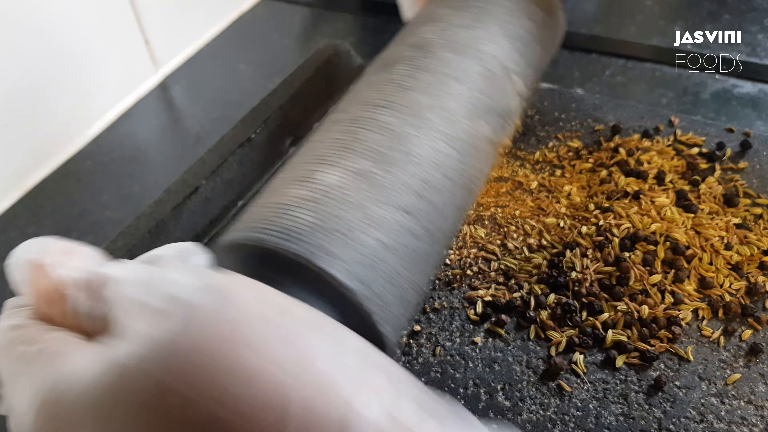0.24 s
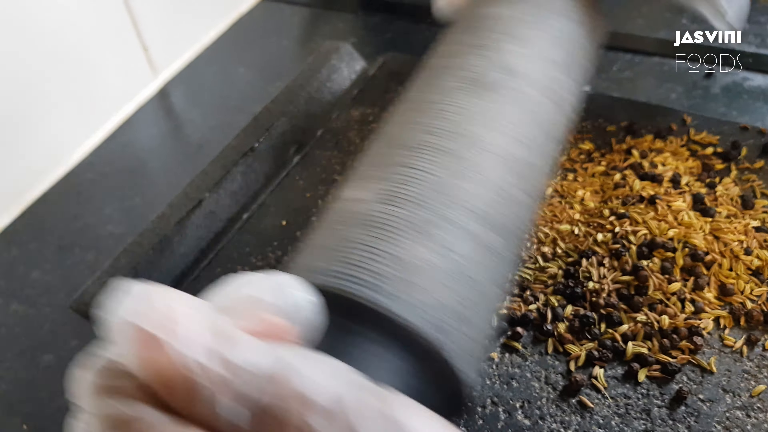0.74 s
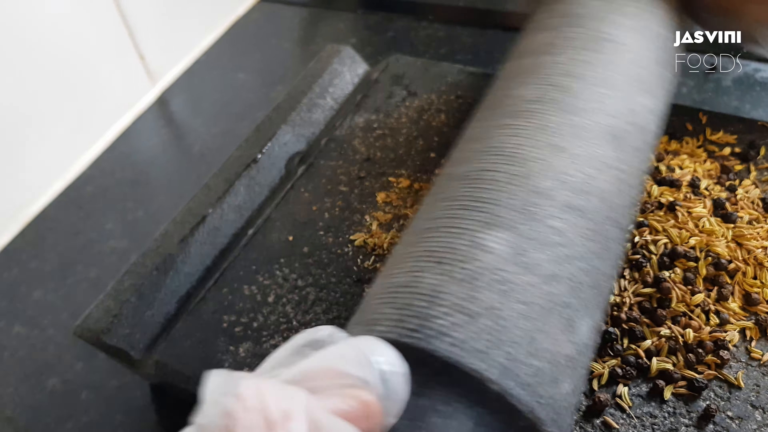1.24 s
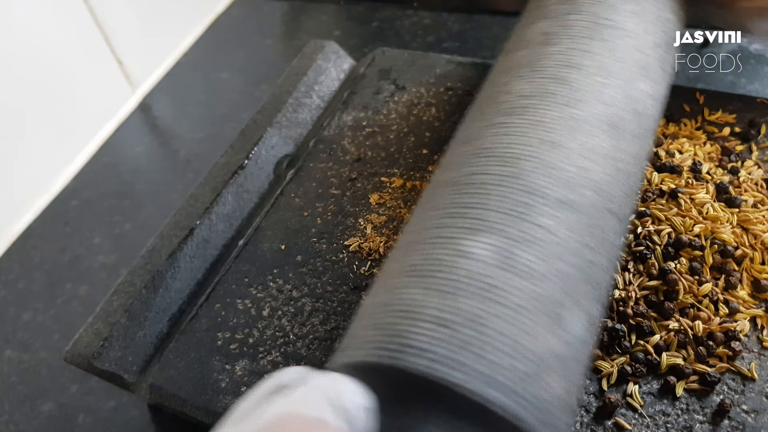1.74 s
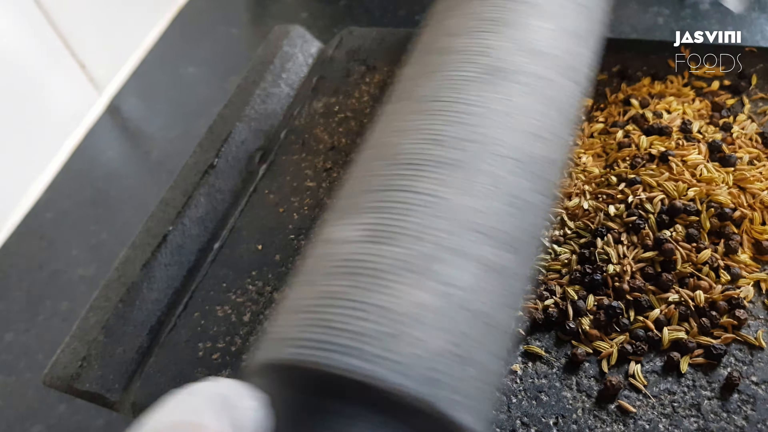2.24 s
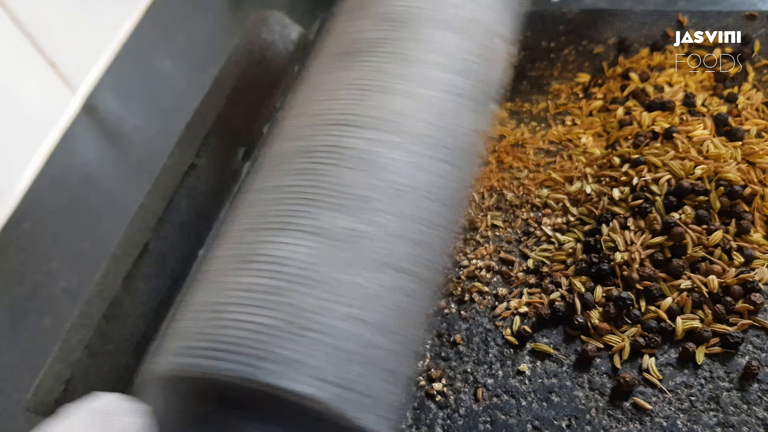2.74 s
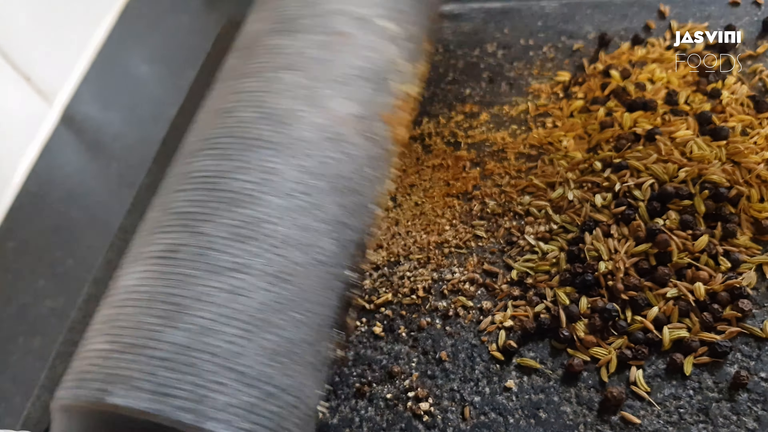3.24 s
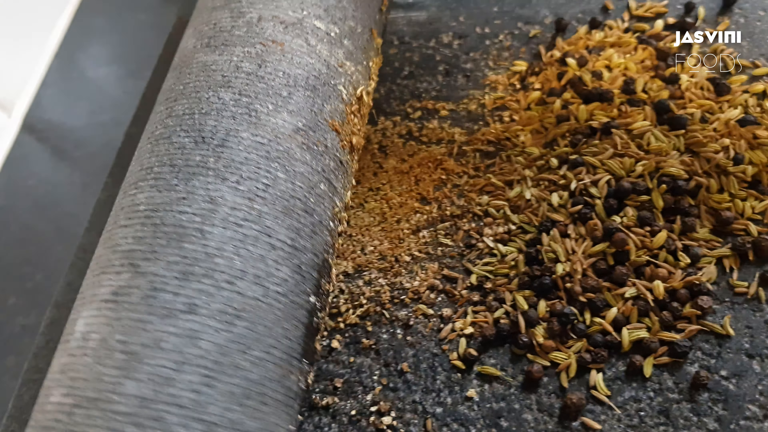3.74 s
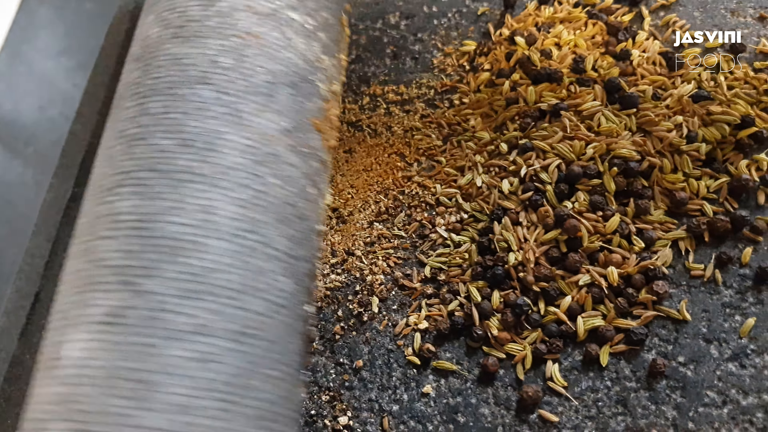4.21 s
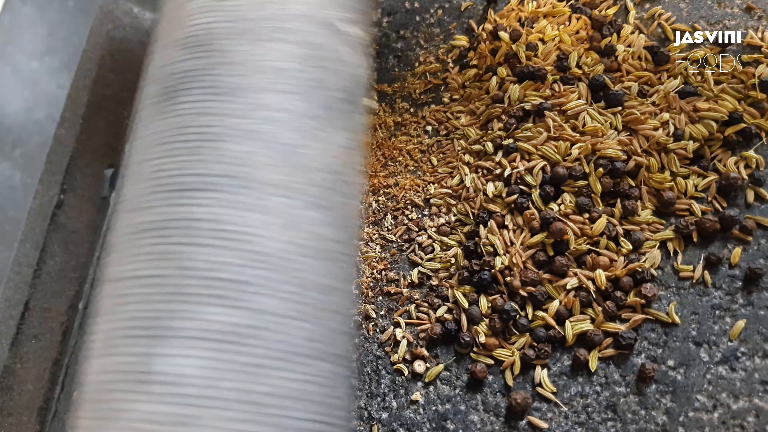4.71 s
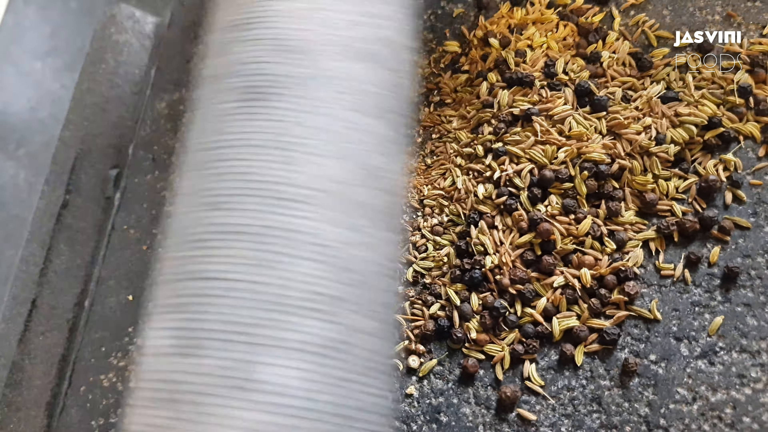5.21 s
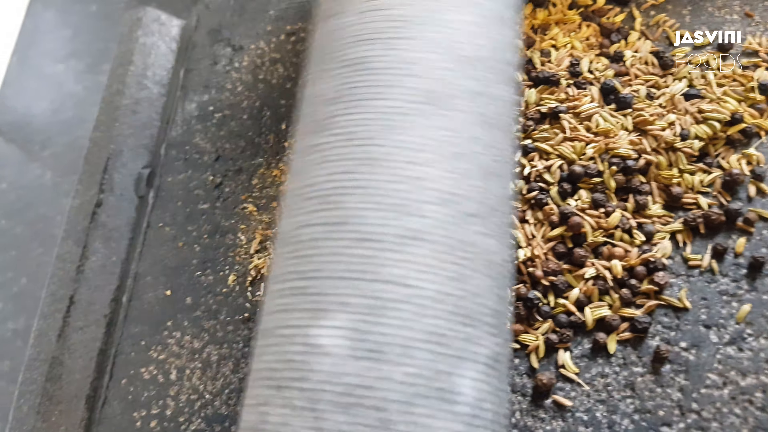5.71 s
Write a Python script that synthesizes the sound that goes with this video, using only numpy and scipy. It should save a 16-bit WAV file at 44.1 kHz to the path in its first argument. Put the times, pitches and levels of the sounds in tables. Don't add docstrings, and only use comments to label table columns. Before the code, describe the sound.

A ribbed stone roller scrapes rapidly back and forth over dry spices on a stone slab, with gritty crunching, thuds and thin ringing squeaks.

```python
import sys
import numpy as np
from scipy import signal
from scipy.fft import rfft, irfft
from scipy.io import wavfile
from scipy.ndimage import uniform_filter1d

SR = 44100
rng = np.random.default_rng(int(sys.argv[2]) if len(sys.argv) > 2 else 0)


def master_out(mix):
    frames = np.transpose(np.atleast_2d(mix))
    ceiling = np.clip(frames, -1, 1)
    pcm = np.round(ceiling * 32767).astype(np.int16)
    wavfile.write(sys.argv[1], SR, pcm)


def boost(x):
    u = np.asarray(x, float) / 20
    return 10 ** u


N = 262836
LEFT_RIGHT = np.array([[0.5], [-0.5]])


def evened(x):
    return x / np.sqrt(np.mean(x ** 2) + 1e-20)


def read(points, hz):
    f, value = np.transpose(points)
    return np.interp(np.log(hz + 1), np.log(f + 1), value)


def grit(per_s, spread_db):
    size = boost(spread_db * np.minimum(rng.exponential(1, N), 3.5))
    sign = rng.choice([-1., 1.], N)
    return evened(size * sign * (rng.random(N) < per_s / SR))


def blows(rows, db):
    force = np.zeros(N)
    force[np.round(np.array(rows)[:, 0] * SR).astype(int)] = boost(db)
    return force


def clumps(db, size):
    return boost(db * evened(uniform_filter1d(rng.standard_normal(N), size)))


def wear(db_per_s):
    return boost(db_per_s * (np.arange(N) - N / 2) / SR)


def mode(force, hz, width):
    pole = np.exp((2j * np.pi * hz - np.pi * width) / SR)
    return signal.lfilter([1], [1, -pole], force)


def struck(force, hz, width, skirt):
    return mode(mode(force, hz, skirt), hz, width) * np.pi * skirt / SR


def rubbed(hz, width):
    tone = struck(grit(2500, 2.1), hz, width, 50)
    height = uniform_filter1d(abs(tone), size=441)
    tone = tone / (height + 0.1 * height.mean()) ** 0.8
    return tone / np.sqrt(np.mean(tone.imag ** 2))


def heard(tone, db, pan_db, lead):
    return (boost(db + pan_db * LEFT_RIGHT) * np.exp(1j * lead * LEFT_RIGHT) * tone).imag


# (frequency [Hz], correlation [-1 to 1])
LIKENESS = [(60, 1), (170, 0.995), (290, 0.86), (640, 0.2), (1410, -0.3), (3100, 0.1), (6820, 0),
            (15000, 0.1)]
# (frequency [Hz], level [dB])
LEAN = [(60, .5), (130, 1), (250, -1), (450, 1), (800, 5.5), (1290, 3.5), (2380, -1), (4400, -1), (8120, 7),
        (15000, 2)]


def paths(spectrum, t60, early_t60, late_db):
    t, hz = np.arange(16384) / SR, np.fft.rfftfreq(16384, 1 / SR)
    shape = boost(-60 * t / early_t60) + boost(late_db - 60 * t / t60)
    a, b = rfft(rng.standard_normal((2, len(t))) * shape)
    same = np.clip(read(LIKENESS, hz), -1, 1)
    pair = np.array([a, same * a + np.sqrt(1 - same ** 2) * b])
    own = np.log(uniform_filter1d(abs(pair) ** 2, size=37, axis=1)) / 2
    wanted_db = np.maximum(read(spectrum, hz), -100) + read(LEAN, hz) * LEFT_RIGHT
    gain = wanted_db * np.log(10) / 20 - own
    mirrored = np.c_[gain, gain[:, -2:0:-1]]
    phase = -signal.hilbert(mirrored).imag[:, :len(hz)]
    fade = np.clip(4 - 5 * t / t[-1], 0, 1)
    response = irfft(pair * np.exp(gain + 1j * phase)) * fade
    return response / np.sqrt((response ** 2).sum() / 2)


def spread(force, turns, *response):
    angle = 2 * np.pi * turns * np.arange(N) / SR
    out = np.zeros((2, N))
    for k in range(3):
        share = force * np.cos(angle + 2 * np.pi * k / 3)
        out += signal.oaconvolve(share[None], paths(*response), axes=1)[:, :N]
    return out / np.sqrt(1.5)


# (frequency [Hz], spectral level [dB per Hz])
ROOM_TONE = [(25, 7), (104, -18), (555, -22), (1200, -15), (2020, -28), (5000, -20), (12300, -15),
             (14200, -44), (15700, -36)]


def kitchen():
    hum = evened(heard(struck(rng.standard_normal(N), 41.5, 22, 25), 0, 0, 0))
    room = spread(rng.standard_normal(N), 22.0, ROOM_TONE, 0.067, 0.011, -49)
    return boost(-61) * room + boost(-56) * hum


# (time of turn [s], speed left at the turn [dB], top speed [dB],
# weight on the counter [dB])
STROKES = [(0.0, -50.5, -52.5, -29.5), (0.251, -68.5, -57, -29), (0.46, -59, -52.5, -30.5),
           (0.726, -65.5, -51, -24), (0.908, -61, -52, -31.5), (1.156, -66, -51, -19),
           (1.357, -55, -52, -30.5), (1.59, -70.5, -49.5, -17), (1.789, -55, -50.5, -26),
           (2.056, -70.5, -51, -26.5), (2.256, -62.5, -50.5, -27.5), (2.49, -66.5, -50, -28),
           (2.71, -61.5, -51, -28), (2.94, -67, -49, -27), (3.151, -63.5, -49, -30),
           (3.37, -70.5, -48.5, -18), (3.594, -62, -49.5, -40), (3.813, -71.5, -49.5, -26),
           (4.024, -59, -50, -29), (4.254, -65.5, -51.5, -30), (4.453, -54, -51.5, -37),
           (4.704, -69, -50.5, -18.5), (4.933, -60.5, -50, -26.5), (5.143, -68.5, -49, -31),
           (5.377, -61.5, -49.5, -27.5), (5.587, -67.5, -49, -21.5), (5.826, -58.5, -50, -13),
           (5.96, -51.5, -60, -40)]
# (top at this share of a push [0-1], of a pull [0-1], roundness [exponent],
# follow [dB per dB of speed], level [dB])
FOLLOWS = [
    (0.5, 0.53, 1.2, 1.3, -33),
    (0.39, 0.34, 1.9, 0.71, -33.5),
    (0.51, 0.37, 1.13, 1.4, -44.5),
    (0.55, 0.35, 0.93, 1.15, -51),
    (0.55, 0.38, 0.85, 2.8, -0.5),
]
PULL_DB = [-0.5, 2.6, -2, 0.2, 10]


def stroke(layer):
    usual_speed_db, usual_weight_db = -51, -32
    turns, rest_db, top_db, weight_db = np.transpose(STROKES)
    push_at, pull_at, roundness, follow, db = FOLLOWS[layer - 1]
    t = np.arange(0, N, 32) / SR
    k = np.clip(np.searchsorted(turns, t, "right") - 1, 0, len(turns) - 2)
    u = np.clip((t - turns[k]) / np.diff(turns)[k], 0, 1)
    at = np.clip(np.where(k % 2, push_at, pull_at), 0.1, 0.9)
    arch = np.sin(np.pi / 2 * np.minimum(u / at, (1 - u) / (1 - at))) ** roundness
    if layer == 2:
        top_db = weight_db - usual_weight_db + usual_speed_db
    rest = rest_db[k + (u > at)]
    speed_db = rest + (top_db[k] - rest) * arch
    pull = PULL_DB[layer - 1] * arch * (0.5 - k % 2)
    gain = boost(db + pull + follow * (speed_db - usual_speed_db))
    return np.interp(np.arange(N) / SR, t, gain)


# (frequency [Hz], width [Hz], level [dB], stroke layer [number])
COUNTER_MODES = [(39, 7.4, -27, 1), (71.2, 30, -10, 1), (93.5, 90, -13, 2), (116, 22.4, -8, 2)]


def counter():
    knocks = blows(KNOCKS, np.array(KNOCKS)[:, 3] + 22)
    out = np.zeros((2, N))
    for hz, width, db, layer in COUNTER_MODES:
        force = grit(600, 2.3) * stroke(layer) + knocks
        out += heard(np.sqrt(width) * struck(force, hz, width, 31), db - 30.0, 1.0, 0)
    return out


def lumpy(x):
    lump_hz, lump_s, lump_db = 200, 0.04, 1.3
    hz, t, z = signal.stft(x, SR, nperseg=1024, noverlap=768)
    across = (hz[:41, None] - hz[20]) ** 2 / lump_hz ** 2
    along = (t[:41] - t[20]) ** 2 / lump_s ** 2
    patch = np.exp(-across * 4 - along * 4)
    field = signal.fftconvolve(rng.standard_normal(z.shape[1:]), patch, "same")
    return signal.istft(z * boost(lump_db * evened(field)), SR, nperseg=1024, noverlap=768)[1][:, :N]


# (frequency [Hz], spectral level [dB per Hz])
SLAB = [(82, -11.5), (140, -24), (157, -5), (301, -5.5), (387, -15.5), (487, -10.5), (552, -19.5),
        (640, -10), (795, -18), (955, -17), (1530, -30), (1650, -16), (1810, -39), (2150, -27.5),
        (2800, -72), (4730, -120)]


def grating():
    uneven = clumps(1.5, size=500)
    force = grit(1500, 2.87) * uneven * stroke(layer=3)
    return boost(3.0) * lumpy(spread(force, 4.5, SLAB, 0.13, 0.032, -27.5))


# (frequency [Hz], spectral level [dB per Hz])
POWDER = [(1530, -18.5), (2600, 0), (3070, -1), (3900, -1.5), (4470, -6.5), (5600, -9), (6170, -9.5),
          (8030, -5.5), (12100, -6.5), (13800, -7), (15700, -11.5)]


def powder():
    uneven = clumps(0.7, size=900)
    force = grit(9000, 0.98) * stroke(layer=4) * uneven
    return boost(1.5) * spread(force, 4.1, POWDER, 0.021, 0.004, -10.5)


# (frequency [Hz], spectral level [dB per Hz])
RASP = [(400, -25.5), (800, -4), (1100, -1.5), (1500, -6.5), (2100, -6), (2700, -12), (4000, -79)]


def rasp():
    force = grit(1500, 2.2) * stroke(layer=5) * wear(1.5)
    return boost(-52.5) * spread(force, 3.3, RASP, 0.42, 0.02, -27.0)


def rattle():
    tone = struck(grit(350, 4.3), hz=3546, width=76, skirt=510)
    tone = tone / np.sqrt(np.mean(tone.imag ** 2))
    level = clumps(3.1, size=2600) * stroke(layer=4) * wear(-3)
    return heard(tone * level, db=-14.5, pan_db=1.4, lead=0.83)


# (time [s], lower bending [dB], upper bending [dB], overtones [dB])
CATCHES = [(0.02, -26, -50, -73), (0.4, -38, -49, -65), (0.55, -65, -51, -66), (0.88, -31, -66, -62),
           (1.02, -50, -40, -67), (1.27, -38, -47, -56), (1.409, -48.5, -57, -65), (1.72, -33.5, -53, -59),
           (1.87, -70, -34.5, -54.5), (2.2, -38.5, -65, -70), (2.34, -68, -42, -56),
           (2.45, -69, -52.5, -74), (2.631, -39, -66, -69), (2.8, -68, -39, -64.5), (3.09, -44, -56, -58),
           (3.222, -51, -54, -64), (3.32, -76, -51, -76), (3.522, -28, -49, -56),
           (3.696, -33, -28.5, -50.5), (3.942, -27, -44, -57.5), (4.11, -30, -37.5, -73),
           (4.22, -70, -37.5, -83), (4.4, -37, -67, -75), (4.58, -61, -49, -67), (4.86, -45, -53, -74),
           (4.988, -34, -38, -70), (5.301, -27.5, -59, -70), (5.46, -29, -34.5, -65),
           (5.742, -34, -51, -77), (5.899, -24, -38, -53.5)]
CATCH_RISE = [240, 140, 191]
CATCH_FALL = [173, 154, 222]
MURMUR_DB = [-80, -65, -74]


def rubbing(group):
    rows = np.array(CATCHES)
    coarse = np.arange(0, N, 64)
    late = coarse / SR - rows[:, :1]
    off_db = np.where(late < 0, -late * CATCH_RISE[group], late * CATCH_FALL[group])
    db = np.maximum((rows[:, group + 1:group + 2] - off_db).max(0), MURMUR_DB[group])
    return boost(np.interp(np.arange(N), coarse, db))


# (time [s], peak [dB], lower bending [dB], upper bending [dB])
SLIPS = [(0.3234, -37, -58.5, -62), (0.446, -42, -53, -64), (0.5591, -39, -52.5, -48),
         (0.823, -40, -46, -59), (1.2121, -47, -48, -49), (1.2426, -41, -46.5, -44), (1.348, -44, -46, -57),
         (1.393, -41, -52, -52.5), (1.4441, -44, -74, -70), (1.893, -39, -59, -40.5),
         (2.1161, -48, -54, -61), (2.148, -42, -52, -56), (2.185, -34, -40.5, -63), (2.3196, -37, -55, -56),
         (2.3715, -43, -63, -50), (2.4194, -54, -71, -63), (2.5616, -43, -57, -64),
         (2.618, -32, -37.5, -52), (2.8534, -41, -53, -50), (3.026, -43, -50, -52),
         (3.0629, -34, -40.5, -48.5), (3.1812, -45, -51, -54), (3.2181, -38, -54, -44),
         (3.268, -39, -66, -55.5), (3.4306, -43, -64, -51), (3.495, -37, -34, -57),
         (3.674, -40, -38.5, -34.5), (4.0731, -40, -40, -60), (4.344, -37, -42, -59),
         (4.399, -34, -41.5, -55), (4.4603, -41, -44.5, -54), (4.5555, -35, -50, -46),
         (4.6244, -42, -53.5, -57), (4.7611, -47, -51, -53), (4.8094, -43, -49, -50.5),
         (4.862, -39, -44.5, -53), (4.9377, -42, -43.5, -57), (4.9671, -37, -43.5, -47.5),
         (5.049, -45, -58, -59), (5.213, -46, -53, -51), (5.261, -40, -36, -52), (5.442, -33, -40.5, -38.5),
         (5.669, -37, -44.5, -46), (5.7364, -33, -37, -57), (5.8484, -33, -36, -57),
         (5.904, -24, -48, -42.5)]
SLIP_DB = [-0.5, -2]


def slipping(k):
    rise_s, hold_s, fall_db_per_s = 0.0057, 0.038, 430
    rows = np.array(SLIPS)
    coarse = np.arange(0, N, 64)
    late = coarse / SR - rows[:, :1]
    fall_db = fall_db_per_s * np.clip(late - hold_s, 0, 1)
    gain = np.clip(late / rise_s, 0, 1) * boost(rows[:, k + 2:k + 3] + SLIP_DB[k] - fall_db)
    return np.interp(np.arange(N), coarse, gain.max(0))


PAIR_HZ = [2301, 2423]
PAIR_WIDTHS_HZ = [14, 14]
# (level in a knock [dB], pan [dB], left lead [rad])
PAIR = [(0, -4.5, .1), (-8, -2.5, -1.2)]
LINGER = [3.2, 0.35]
# (frequency [Hz], spectral level [dB per Hz])
RING_ROOM = [(1200, -24.5), (2000, -21.5), (2360, 3.5), (2700, 2.5), (3600, -6), (6000, -63.5)]
OVERTONES_HZ = [3540, 5007, 5738, 6638, 7757, 8220, 9895, 10557, 12042, 13378]
# (width [Hz], level [dB], pan [dB], left lead [rad], share of catches in the drive [0-1])
OVERTONES = [(51.7, -2, 15, 2, 0.5), (16, 3, 0.5, 4, 0), (27.4, 4, -5, 5, 0.93), (18.3, -9, -26, 4, 0),
             (18, -15, -20, 26, 0.2), (35, -3, 9, -1.1, 0), (26.84, -27, 5, -8, .4), (25, -5.5, 9, 0, 0),
             (28, -6, 4, -7, 0.5), (30, -13, 3, -4, 0)]
WEAR = [0, 1, 1]


def roller():
    out = np.zeros((2, N))
    knocks = blows(KNOCKS, np.array(KNOCKS)[:, 2])
    hiss = stroke(layer=4)
    moving = np.minimum(hiss / boost(-58.0), 1) ** 2
    for k, (hz, width, (knock_db, pan_db, lead)) in enumerate(zip(PAIR_HZ, PAIR_WIDTHS_HZ, PAIR)):
        blow = boost(-2.0 + knock_db) * struck(knocks, hz, width, 270)
        caught = rubbing(k) * moving ** (LINGER[k] / 2) * boost(-11)
        song = rubbed(hz, width / 2) * np.maximum(caught, slipping(k))
        out += heard(song + blow, 0.83, pan_db, lead)
    out += heard(struck(knocks, PAIR_HZ[0], 42, 460), 1.36, -7.0, 0.99)
    out += boost(-19) * spread(out[1], 1.7, RING_ROOM, 0.3, 0.03, -9)
    for hz, (width, db, pan_db, lead, share), drift in zip(OVERTONES_HZ, OVERTONES, WEAR + [0] * 7):
        patches = clumps(6 - 2 * share, size=2200)
        drive = (rubbing(2) * moving) ** share * (hiss * boost(-17.5)) ** (1 - share)
        blow = boost(1.0 - 6.13 * hz / 1000) * struck(knocks, hz, width, 260)
        song = rubbed(hz, width) * drive * patches * moving ** 0.38 * wear(drift)
        out += heard(song + blow, db, pan_db, lead)
    return out


# (time [s], thud [dB], roller ring [dB], counter [dB], pan [dB])
KNOCKS = [(0.045, -8, -27, -16.5, 13), (0.383, -15.5, -45, -23, -13), (0.494, -6.5, -23.5, -22, -9),
          (0.931, -8, -22, -17.5, -9), (1.317, -24.5, -58, -24, -17), (1.756, -6, -15, -23.5, 18),
          (1.818, -18, -64, -45, -8), (2.055, -36, -79, -42, -5), (2.247, -24, -45, -26.5, -19),
          (2.318, -24.5, -39, -18.5, 6), (2.616, -18.5, -44, -51, -3), (2.72, -6, -14.5, -27, -2),
          (3.014, -21.5, -68, -20.5, -13), (3.425, -29.5, -53, -27, -1), (3.59, -19, -78, -23.5, 12),
          (3.893, -10.5, -26.5, -19.5, 5), (4.051, -19, -61, -17, 1), (4.344, -29, -47, -25, -2),
          (4.448, -17.5, -70, -20.5, 12), (4.484, -51, -47, -23, -11), (4.507, -14, -25.5, -21, -6),
          (4.755, -28.5, -66, -27, -20), (5.378, -20, -76, -23.5, 3), (5.74, -18, -60, -22, 7)]
# (time [s], peak [dB])
BUMPS = [(0.479, -38), (0.76, -40), (1.174, -45), (1.197, -32), (1.255, -29), (1.373, -27.5), (1.637, -47),
         (2.096, -38), (2.519, -47), (2.547, -44), (2.989, -44), (3.167, -39), (3.196, -35.5), (3.212, -33),
         (3.401, -45), (3.858, -41), (4.317, -47), (4.362, -30), (4.955, -33), (5.202, -40), (5.637, -44),
         (5.664, -28.5), (5.815, -39)]
# (frequency [Hz], spectral level [dB per Hz])
THUD = [(82, -3.5), (140, -17.5), (215, 7.5), (313, 11), (420, -2), (700, 1), (939, -3), (1190, 2.5),
        (1300, -1), (1690, 3), (1940, -2.5), (2100, 0), (2730, -25), (3600, -30), (4620, -78)]


def thuds():
    rows = np.array(KNOCKS)
    lean_db = np.interp(np.arange(N) / SR, rows[:, 0], rows[:, 4])
    hard = rows[:, 1] > -15.5
    soft = blows(rows[~hard], rows[~hard, 1] + 14)
    soft = soft + blows(BUMPS, np.array(BUMPS)[:, 1] + 18.5)
    soft = signal.sosfilt(signal.butter(3, 1230, fs=SR, output="sos"), soft)
    force = blows(rows[hard], rows[hard, 1] + 13) + soft
    thud = spread(force, 3.6, THUD, 0.22, 0.02, -16.5)
    return thud * boost(0.15 * lean_db * LEFT_RIGHT)


# (frequency [Hz], level [dB], t60 [s])
SLAB_MODES = [(297, -26, 0.32), (494.4, -8, 0.17), (729, 0, 0.072), (897, -14.5, 0.51), (986, -1.5, 0.045),
              (1560, -17, 0.2), (1774, -28, 0.16)]


def slab_ring():
    knocks = blows(KNOCKS, np.array(KNOCKS)[:, 1] - 20.5)
    out = np.zeros((2, N))
    for hz, db, t60 in SLAB_MODES:
        tone = struck(knocks, hz, 1.49 / min(t60, 0.12), 300)
        out += heard(tone, db, 1.5, rng.uniform(0, 3.0))
    return out


# (time [s], peak [dB], pan [dB], tail t60 [s])
CRACKS = [
    (0.2384, -19, -3.5, 0.043),
    (0.3795, -26.5, 1.0, 0.044),
    (0.394, -24.5, -1, 0.18),
    (0.4945, -22.5, -1, 0.054),
    (1.779, -14, -3, 0.089),
    (3.5265, -23.5, 3, 0.052),
    (4.4856, -29, -1, 0.034),
    (4.863, -23.5, 0, 0.038),
]
# (frequency [Hz], spectral level [dB per Hz])
SNAP = [(1180, -32), (2000, -14.5), (5340, -7), (5820, -9.5), (9350, -7), (14300, -4), (15700, -12)]


def cracks():
    out, t = np.zeros((2, N + 4000)), np.arange(4000) / SR
    for s, db, pan_db, t60 in CRACKS:
        decay = boost(db - 16.5 - 60 * t / np.clip(t60, 0.005, 0.3))
        fizz = rng.standard_normal((2, len(t))) * decay
        out[:, round(s * SR):][:, :len(t)] += fizz * boost(pan_db * LEFT_RIGHT)
    return signal.oaconvolve(out, paths(SNAP, 0.016, 0.0005, -29), axes=1)[:, :N]


def scene():
    return (counter() + grating() + roller() + thuds() + powder() + cracks() + kitchen() + slab_ring()
            + rattle() + rasp())


def low_pass(x):
    return signal.sosfilt(signal.butter(12, 15840, fs=SR, output="sos"), x)


# (frequency [Hz], level [dB])
GATE = [(12000, -110), (13600, -99), (14300, -88), (15300, -79), (15850, -40)]


def record(dry):
    cut = signal.sosfilt(signal.butter(6, 36, "high", fs=SR, output="sos"), dry)
    hz, _, z = signal.stft(cut, SR, nperseg=1024, noverlap=768)
    power = uniform_filter1d(abs(z) ** 2, size=3, axis=2)
    band_db = 10 * np.log10(uniform_filter1d(power, size=7, axis=1).mean(0) + 1e-20)
    around_db = uniform_filter1d(band_db, size=61, axis=0)
    masked = (band_db < around_db - 5.5) & (hz[:, None] > 4200) & (hz[:, None] < 7800)
    rows, cols = np.arange(len(hz)) // 8 * 8, np.arange(z.shape[2]) // 8 * 8
    block_db = uniform_filter1d(band_db, size=8, axis=1) + 3.5 * rng.standard_normal(band_db.shape)
    keep = (block_db[rows][:, cols] > read(GATE, hz)[:, None]) & ~masked
    gated = signal.istft(z * keep, SR, nperseg=1024, noverlap=768)[1][:, :N]
    return low_pass(gated)


dry = scene()
out = record(dry)
master_out(out)
```